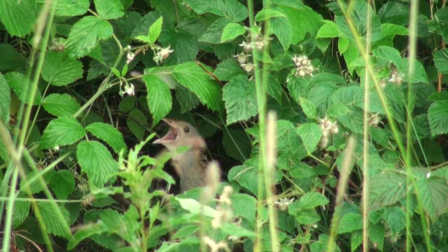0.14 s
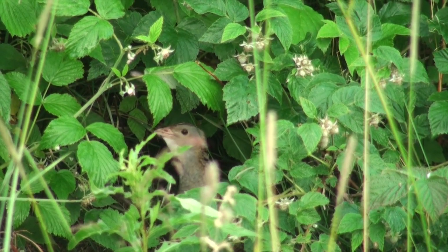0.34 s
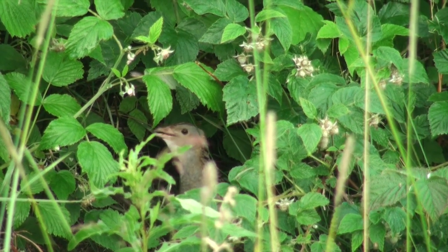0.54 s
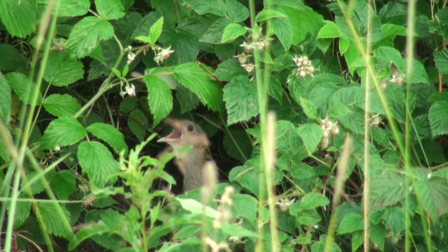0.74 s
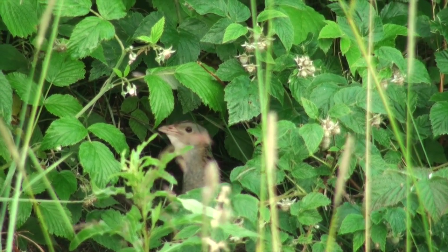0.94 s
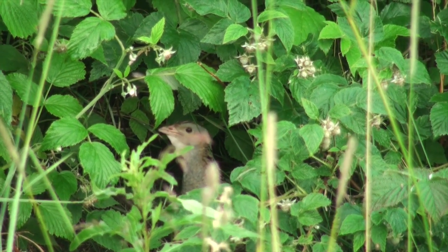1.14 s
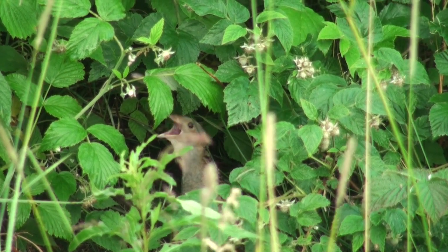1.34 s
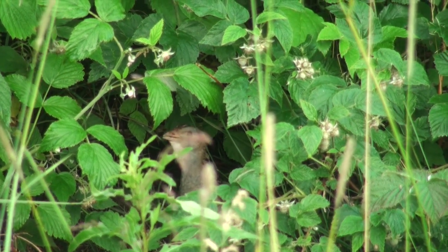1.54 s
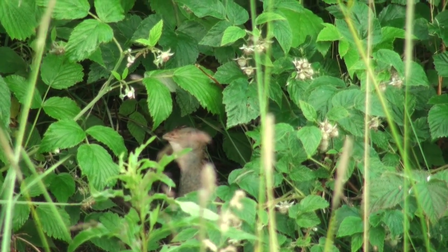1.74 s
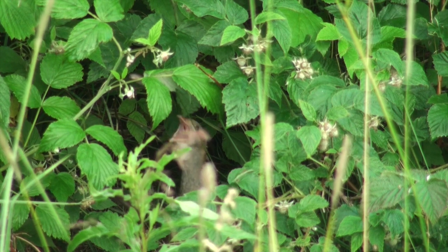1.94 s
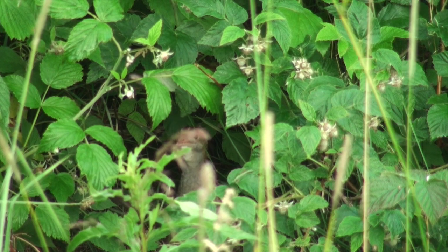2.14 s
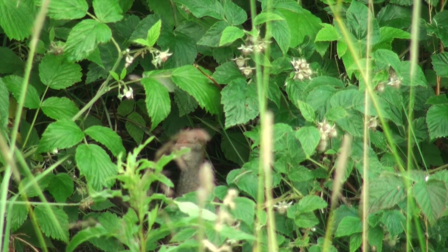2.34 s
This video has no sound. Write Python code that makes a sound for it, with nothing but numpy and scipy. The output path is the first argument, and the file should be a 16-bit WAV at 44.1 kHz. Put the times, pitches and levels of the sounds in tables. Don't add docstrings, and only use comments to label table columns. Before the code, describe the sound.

Harsh, ratchet-like corncrake calls, four in over two seconds, close to a camera microphone outdoors, with short leafy echoes, a far-off rival's smeared throbbing rasp, thin late chirps, and faint low wash with mains hum.

```python
import sys
import numpy as np
from scipy import signal
from scipy.fft import rfft, irfft
from scipy.io import wavfile
from scipy.ndimage import uniform_filter1d, minimum_filter1d

SR = 44100
rng = np.random.default_rng(int(sys.argv[2]) if len(sys.argv) > 2 else 0)


def ratio_of_db(decibels):
    return 10 ** (np.asarray(decibels, float) / 20)


def pcm_store(signal):
    levels = np.round(np.clip(np.atleast_2d(signal), -1, 1) * 32767)
    wavfile.write(sys.argv[1], SR, levels.astype(np.int16).T)


N = 105840


def read(points, hz):
    f, value = np.transpose(points)
    return np.interp(np.log(hz + 1), np.log(f + 1), value)


def evened(x):
    return x / np.sqrt(np.mean(x ** 2) + 1e-20)


def add(mix, start_s, sound):
    part = mix[round(start_s * SR):][:len(sound)]
    part += sound[:len(part)]


def colour(x, points):
    gain_db = read(points, np.fft.rfftfreq(len(x), 1 / SR))
    return irfft(rfft(x) * ratio_of_db(gain_db), len(x))


def drifting(x, first, second, axis=-1):
    return uniform_filter1d(uniform_filter1d(x, first, axis), second, axis)


def scatter(t60_points):
    hz, t, z = signal.stft(rng.standard_normal(SR), SR, nperseg=256)
    decay = ratio_of_db(-60 * t / read(t60_points, hz)[:, None])
    tail = signal.istft(z * decay, SR, nperseg=256)[1]
    return tail / np.linalg.norm(tail)


def haze():
    # frequency [Hz], density [dB per Hz].
    wash_tone = [(15, -30.5), (25, -10), (123, -21), (229, -7.5), (309, -11), (427, -3.5), (2220, -22),
                 (5570, -24), (16000, -38.5)]
    side_tone = [(15, -30), (25, 7), (463, -26), (2550, -38), (6560, -48), (8360, -17.5), (16000, -19)]
    # frequency [Hz], level [dB].
    hum = [(50, -65.5), (100, -75)]
    wash_db, side_db, patch_db = -50, -70.5, 1.2
    hz, t, z = signal.stft(colour(rng.standard_normal(N), wash_tone), SR, nperseg=1024, noverlap=768)
    patches = rng.standard_normal(z.shape)
    patches = evened(drifting(drifting(patches, 8, 1, 0), 16, 1, 1))
    wash = signal.istft(z * ratio_of_db(patch_db * patches), SR, nperseg=1024, noverlap=768)[1][:N]
    mid = ratio_of_db(wash_db) * evened(wash)
    mid += sum(ratio_of_db(db + 8) * np.sin(2 * np.pi * f * np.arange(N) / SR) for f, db in hum)
    side = ratio_of_db(side_db) * evened(colour(rng.standard_normal(N), side_tone))
    return np.array([mid + side, mid - side])


def songbirds():
    # start [s], length [s], from [Hz], to [Hz], level [dB].
    chirps = [(1.742, .028, 3050, 3100, -54), (1.84, .015, 2950, 3150, -60), (1.85, .025, 4600, 4850, -63),
              (1.89, .025, 4900, 4300, -61), (2.157, .04, 4970, 4120, -46), (2.26, .035, 4800, 4750, -56),
              (2.296, .026, 4800, 4750, -50), (2.272, .052, 2950, 1900, -56),
              (2.326, .046, 3050, 1720, -56), (2.335, .012, 5400, 5600, -57),
              (2.352, .047, 5650, 4620, -52), (1.17, .04, 5200, 4300, -66)]
    flutter_depth = .45
    churr_start_s, churr_length_s, churr_hz, churr_db = 1.772, .045, 3950, -42
    out = np.zeros(N)
    for start, length, from_hz, to_hz, db in chirps:
        u = np.arange(0, 1, 1 / SR / length)
        swell = evened(drifting(rng.standard_normal(4000), 150, 100))[:len(u)]
        level = ratio_of_db(db) * 2 * (1 + flutter_depth * swell) * np.sqrt(np.sin(np.pi * u))
        turns = np.cumsum(from_hz + (to_hz - from_hz) * u) / SR
        add(out, start, level * np.sin(2 * np.pi * turns))
    u = np.arange(0, 1, 1 / SR / churr_length_s)
    phase = 2 * np.pi * churr_hz * u * churr_length_s
    a, b = drifting(rng.standard_normal((2, len(u))), 50, 40, 1)
    husky = evened(a * np.sin(phase) + b * np.cos(phase))
    add(out, churr_start_s, ratio_of_db(churr_db) * np.sin(np.pi * np.sqrt(u)) * husky)
    echo = scatter([(1000, 0.75), (8000, 0.085)])
    return out + ratio_of_db(-8) * signal.fftconvolve(out, echo)[:N]


def beats(count, last_ms):
    lead_ms = [6.7, 7.1]
    beat_ms = [9.0, 7.3, 8.0, 9.5, 6.8]
    close_ms = [9.8, 8.3]
    drag, drag_beats, jitter_ms = .085, 4.0, .12
    k = np.arange(int(count))
    steady_ms = np.array(beat_ms)[k % 5] * (1 + drag * np.exp(-k / drag_beats))
    gaps_ms = np.r_[0, lead_ms, steady_ms, close_ms, last_ms]
    return (np.cumsum(gaps_ms) + jitter_ms * rng.standard_normal(len(gaps_ms))) / 1000


def rival():
    # start [s], steady beats [count], effort [dB].
    calls = [
        (.018, 21.4, -38),
        (.70, 5, -33),
        (1.233, 16, -38.5),
        (1.92, 8.4, -38),
    ]
    # frequency [Hz], level [dB].
    tone = [(1900, -19), (2800, -32), (3400, -13), (4500, -9), (5150, -2), (5700, -13), (6450, 3),
            (8000, -22)]
    rise_s, smear_t60_s = 0.02, 0.56
    out = np.zeros(N)
    for start, count, effort_db in calls:
        times = beats(count, 11)
        at = np.round((start + times) * SR).astype(int)
        out[at] = ratio_of_db(effort_db) * np.minimum(0.75 + times / rise_s, 1)
    smear = rng.standard_normal(SR) * ratio_of_db(-60 * np.arange(SR) / SR / smear_t60_s)
    smear = colour(smear, [(800, -55)] + tone + [(8500, -59.5)])
    return 20 * signal.fftconvolve(out, smear / np.linalg.norm(smear))[:N]


def voiced(t, tension, luck):
    # multiple of the buzz pitch [ratio], level [dB].
    overtones = [(1, -11.5), (2, -2), (3, -15.5), (4, -12), (5, -18.5), (6, -12), (7, -28.5), (8, -33.5),
                 (9, -27), (10, -35)]
    buzz_hz, wobble, glide = 932.8, 0.017, .22
    peak_s, shut_s, shut_fall_s, open_level = .0017, .0037, .0006, .5
    pitch_hz = buzz_hz * (tension + wobble * luck[0] + glide * np.minimum(t / shut_s, 1))
    turns = np.cumsum(pitch_hz) / SR - .3
    shape = np.minimum(open_level + (1 - open_level) * t / peak_s, 1) * np.minimum(t / shut_fall_s, 1)
    shape /= 1 + np.exp(np.minimum((t - shut_s) / shut_fall_s, 50))
    return shape * sum(ratio_of_db(db + 1.3 * luck[k]) * np.cos(2 * np.pi * k * turns + 0.13 * k * luck[11 + k])
                       for k, db in overtones)


def snapped(t, rest_ms, luck):
    # mode [Hz], level [dB], t60 [s].
    modes = [(1694, -10.5, 0.066), (2750, -7.5, 0.018), (4050, -28, .016), (4530, -16, .016),
             (5000, -2, 0.013), (5800, -18, 0.0098), (6000, -23, 0.0062), (6400, -5, 0.013),
             (6970, -13.5, 0.042), (8150, -10.5, 0.014), (9000, -18, 0.024), (8900, -15.5, 0.006),
             (9650, -10.5, 0.016), (12800, -33, .003)]
    delay_s, ring_db, rattle_db, rattle_s = .0004, -9, -6, .0035
    crack_hz, crack_s, crack_db = 6000, .00034, 1.5
    spread_db, db_per_ms, slack_db = .9, 1.2, -12
    late = t - delay_s
    knocks = ratio_of_db(rattle_db) / np.pi * rng.standard_normal(len(t)) * np.exp(-t / rattle_s) * (late > 0)
    knocks[round(delay_s * SR)] += 1
    ring = sum(ratio_of_db(db - 60 * t / t60) * np.sin(2 * np.pi * hz * (1 + 0.0096 * luck[24 + k]) * t)
               for k, (hz, db, t60) in enumerate(modes))
    crack = -np.exp(-(late / crack_s - 1.3) ** 2)
    crack *= np.cos(2 * np.pi * crack_hz * (1 + .03 * luck[38]) * (late - 1.3 * crack_s))
    snap = ratio_of_db(crack_db) * crack + ratio_of_db(ring_db) * 0.42 * np.convolve(knocks, ring)[:len(t)]
    rest_db = db_per_ms * np.clip(rest_ms - 9, -3, 1) + slack_db * (rest_ms > 12)
    return ratio_of_db(spread_db * luck[39] + rest_db) * snap


def buzz(tension, rest_ms):
    t, luck = np.arange(700) / SR, rng.standard_normal(40)
    return voiced(t, tension, luck) + snapped(t, rest_ms, luck)


def rasps():
    # start [s], steady beats [count], gap before last buzz [ms], last buzz [dB], effort [dB].
    runs = [
        (0.1751, 15.3, 16, -11.5, -5.5),
        (0.6943, 18, 9.8, -1.5, -5.5),
        (1.4292, 15, 11, -1, -6),
        (1.9446, 18, 11.0, -3, -6),
    ]
    low_start, low_end, settle_beats = 0.12, 0.19, 0.9
    first_db, second_db, spread_db = -1, 4, .5
    out = np.zeros(N)
    for start, count, last_ms, last_db, effort_db in runs:
        times = beats(count, last_ms)
        k = np.arange(len(times))
        tension = 1 - low_start * np.exp(-k / settle_beats)
        tension -= low_end * (k == k[-1]) * min(-last_db / 6, 1)
        level_db = effort_db + spread_db * rng.standard_normal(len(times))
        level_db[[0, 1, -1]] += [first_db, second_db, last_db]
        rests_ms = np.diff(times, prepend=0) * 1000
        for s, db, tense, rest_ms in zip(times, level_db, tension, rests_ms):
            add(out, start + s, ratio_of_db(db) * buzz(tense, rest_ms))
    return out


def crake():
    # frequency [Hz], t60 [s].
    field_t60 = [(700, .1), (2000, .1), (4500, .5), (6500, .7), (10000, .15)]
    # frequency [Hz], level [dB].
    field_tone = [(700, -30), (2600, -28), (4300, -5), (6200, 0), (7500, -8), (9000, -22)]
    leaves_tone = [(700, -12), (2500, -7), (4500, 0), (8000, 0), (16000, 0)]
    notch_hz, notch_width_hz, notch_depth, throat_low_hz = 3600, 250, .85, 733
    field_db, leaves_db, leaves_t60_s, side_leak_db = -38, -8, .04, -36
    hz = np.fft.rfftfreq(N, 1 / SR) + 1
    throat = 1 - notch_depth * np.exp(-((hz - notch_hz) / notch_width_hz) ** 2)
    throat /= 1 + (throat_low_hz / hz) ** 12
    out = irfft(rfft(rasps()) * throat, N)
    leaves = rng.standard_normal((2, 4000)) * ratio_of_db(-60 * np.arange(4000) / SR / leaves_t60_s)
    leaves /= np.linalg.norm(leaves[0])
    tail = ratio_of_db(field_db) * colour(scatter(field_t60), field_tone)
    tail[40:3040] += ratio_of_db(leaves_db) * colour(leaves[0], leaves_tone)[:3000]
    side = ratio_of_db(side_leak_db) * signal.fftconvolve(out, leaves[1])[:N]
    return out + signal.fftconvolve(out, tail)[:N] + np.array([side, -side])


def scene():
    return haze() + crake() + rival() + songbirds()


def leaky(x, time_s):
    r = np.exp(-1 / SR / time_s)
    return signal.lfilter([1 - r], [1, -r], x)


def preamp(x):
    kick_gain, kick_s, droop_gain, droop_s = 0.14, 0.12, .12, 0.094
    bend, hold_s = 0.029, .07
    power = uniform_filter1d(x ** 2, 60, 1)
    size = 2 * round(hold_s * SR / 2) + 1
    held = -minimum_filter1d(-uniform_filter1d(power.mean(0), 100), size, origin=size // 2)
    onsets = np.maximum(np.diff(held, prepend=0), 0)
    kick = leaky(onsets, kick_s) * kick_s * SR
    drift = kick_gain * kick - droop_gain * leaky(held, droop_s)
    shift = drift * ratio_of_db([[.5], [-.5]]) + bend * power
    return np.clip(x + shift, -.97, .97)


def top_cut(x):
    return signal.sosfilt(signal.butter(12, 16660, fs=SR, output="sos"), x)


def record(dry):
    edge = signal.firwin(255, 15900, window=("kaiser", 8), fs=SR)
    mix = signal.oaconvolve(preamp(dry), edge[None], "same")
    return top_cut(mix)


dry = scene()
out = record(dry)
pcm_store(out)
```